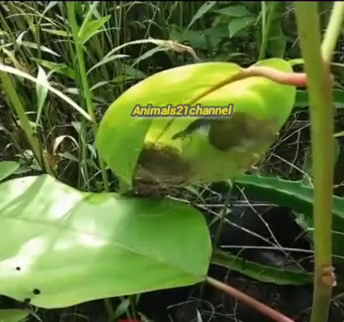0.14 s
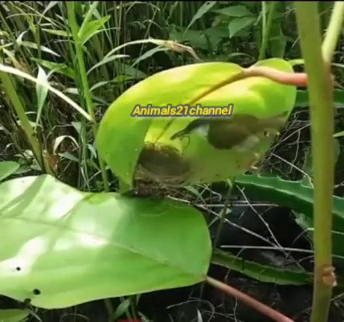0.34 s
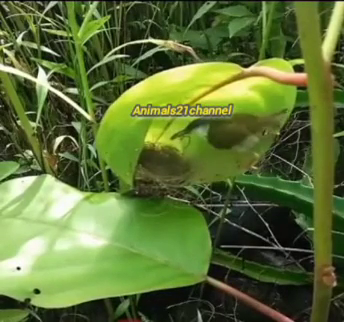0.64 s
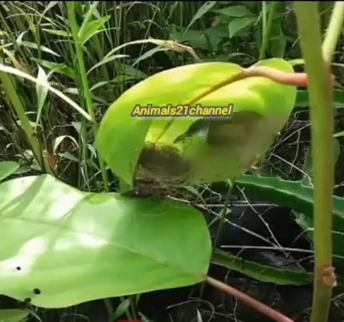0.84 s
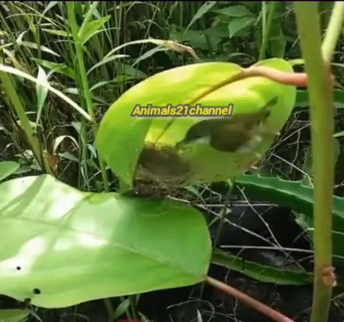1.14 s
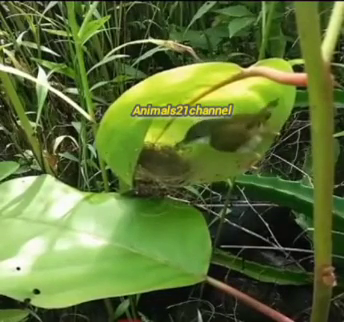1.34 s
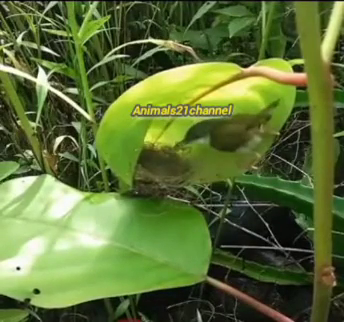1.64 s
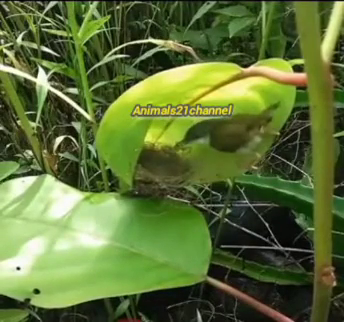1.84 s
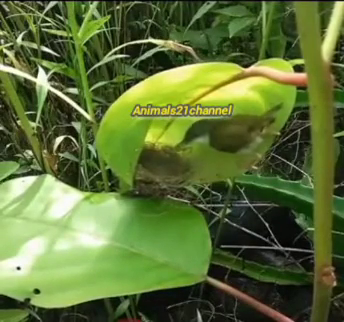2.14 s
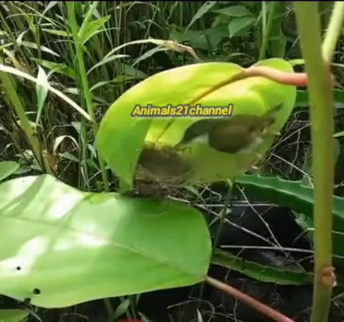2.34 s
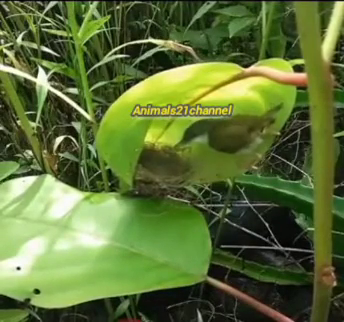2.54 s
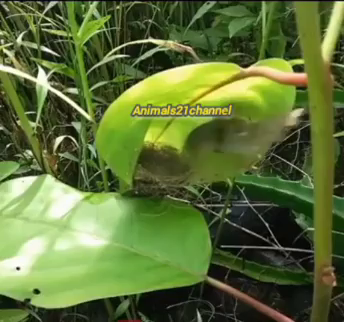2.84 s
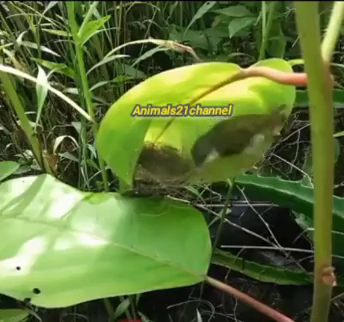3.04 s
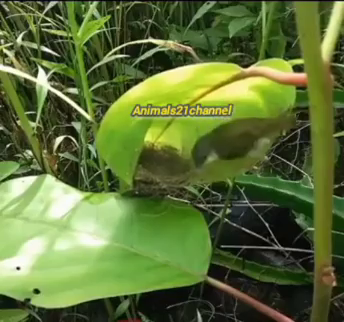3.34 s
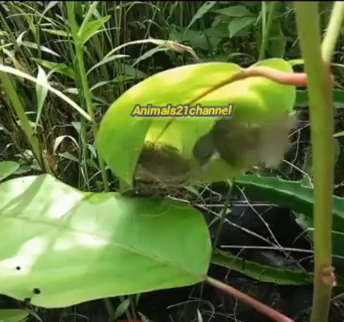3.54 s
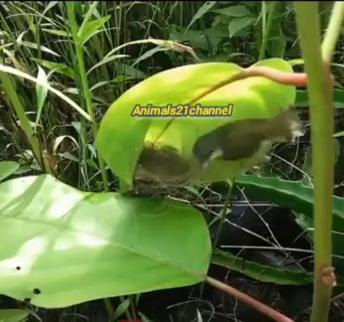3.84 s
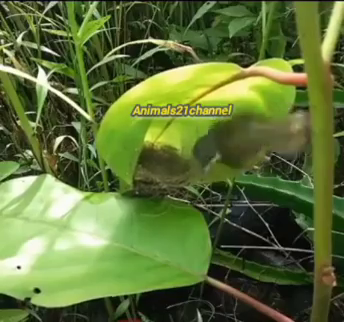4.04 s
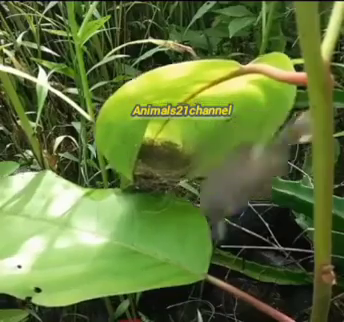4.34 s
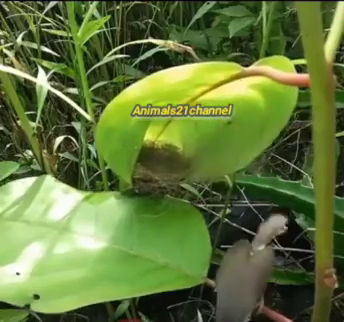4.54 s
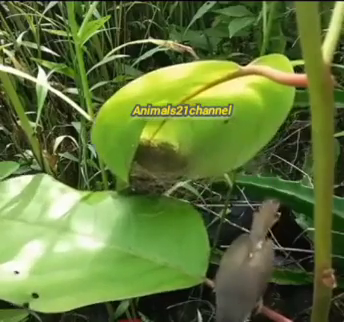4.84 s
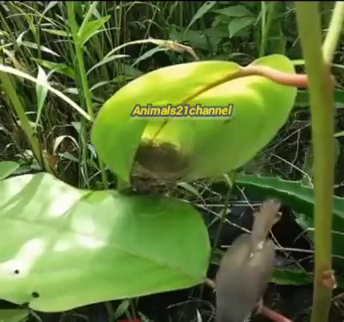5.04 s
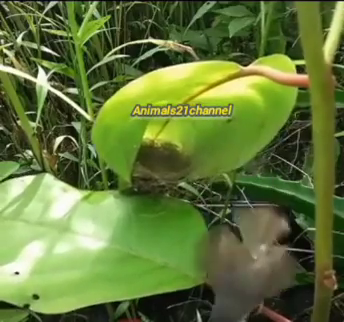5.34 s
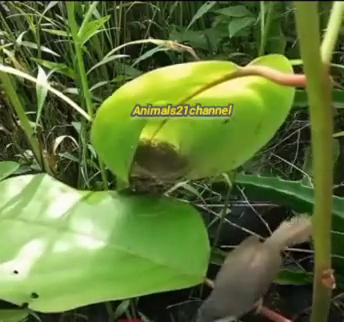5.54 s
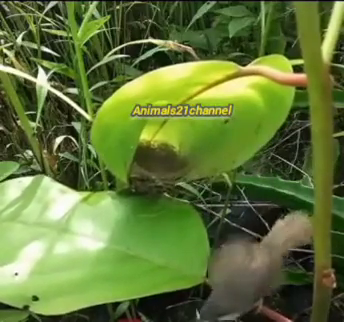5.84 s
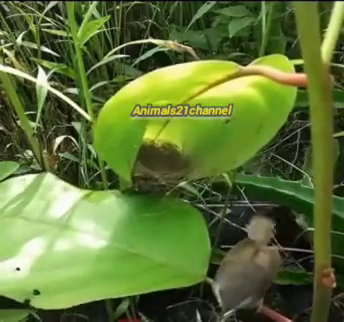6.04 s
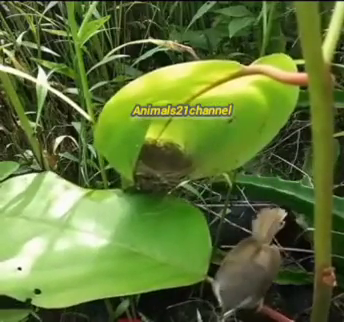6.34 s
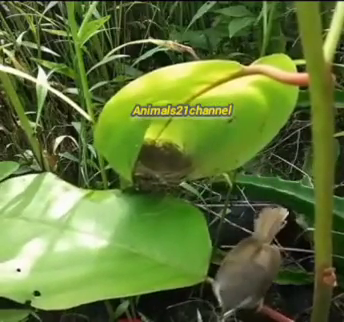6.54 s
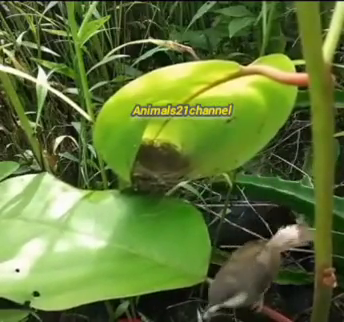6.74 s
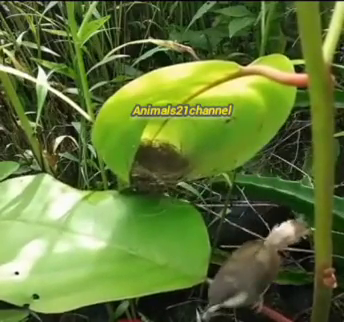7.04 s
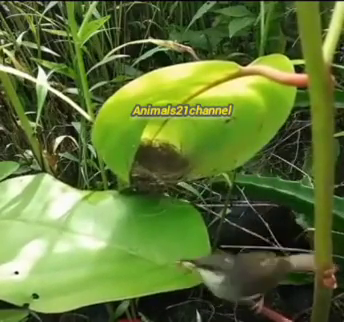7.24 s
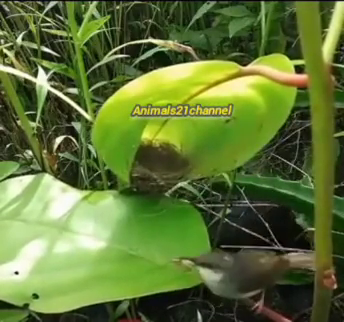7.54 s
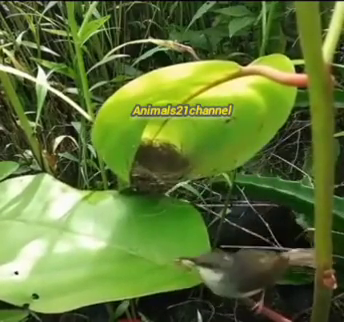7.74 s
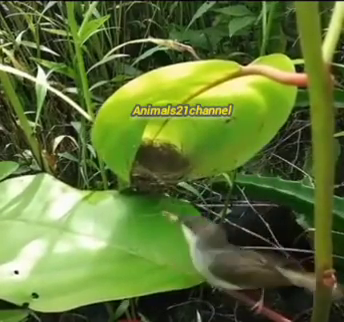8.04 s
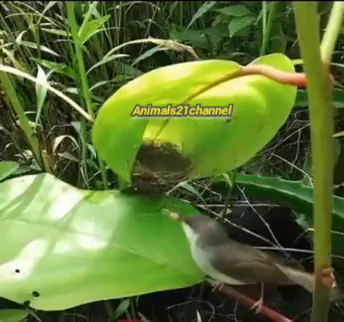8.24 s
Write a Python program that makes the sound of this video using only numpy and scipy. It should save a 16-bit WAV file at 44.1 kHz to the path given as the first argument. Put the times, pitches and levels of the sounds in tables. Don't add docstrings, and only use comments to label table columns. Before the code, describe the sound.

Outdoors in thick foliage, a steady low-pitched cicada buzz, a cricket chirping about five times a second, faint insect ticking and soft wind run throughout. At 0-0.8 s a bird a few metres away sings rapid high pips and sliding whistles, followed by scratchy rasps until 0.9. From 1.06 to 2.3 a closer bird gives piercing rising whistles, some breathy, with brief chattering chips. A tiny twig tick comes at 2.55. A buzzing trill at 2.8-3.0 leads into bounced notes and a hurried whistled run, 3.2-3.9, with a dull handling bump near 3.9. Scooped whistles with dropping flicks sound at 4.3-4.5. The middle is quiet: faint distant calls around 4.9, 6.2 and 6.5, dry rasps at 5.5-5.8. Another trill buzzes at 6.8-7.05, then three whistled phrases at 7.25, 7.6 and 8.0. Cricket and drone strengthen slightly towards 8.4. Leaves leave short, fluttering echoes.

```python
import sys
import numpy as np
from scipy import signal
from scipy.fft import rfft, irfft
from scipy.io import wavfile
from scipy.ndimage import uniform_filter1d

SR = 44100
rng = np.random.default_rng(int(sys.argv[2]) if len(sys.argv) > 2 else 0)


def ratio_of_db(decibels):
    return 10 ** (np.asarray(decibels, float) / 20)


def log_audio(samples):
    frames = np.atleast_2d(samples).T
    limited = np.clip(frames, -1, 1)
    pcm = np.round(limited * 32767).astype(np.int16)
    wavfile.write(sys.argv[1], SR, pcm)


N = 370440


def level(x, db):
    return x * ratio_of_db(db) / np.sqrt(np.mean(np.abs(x) ** 2))


def band(x, lo_hz, hi_hz):
    return signal.sosfilt(signal.butter(2, [lo_hz, hi_hz], "band", fs=SR, output="sos"), x)


def flutter(hz):
    size = N // 8 + 2
    noise = rng.standard_normal(size) + 1j * rng.standard_normal(size)
    slow = signal.sosfilt(signal.butter(4, hz, fs=SR / 8, output="sos"), noise)
    return level(np.interp(np.arange(N) / 8, np.arange(size), slow), 0)


def joined(a, b):
    return abs(a[0] + a[1] - b[0]) < .0015 and abs(a[3] / b[2] - 1) < .04


# (from [s], to [s], level under the note [dB])
OCTAVE_DOWN = [(1.47, 1.6, -38), (1.742, 2.1, -24.5), (2.149, 2.4, -22), (4.339, 4.6, -19.5),
               (7.258, 8.3, -21)]
# (from [s], to [s])
WARBLED = [(0, .12), (.56, .64), (.69, .82), (1.74, 1.77), (2.15, 2.225), (3.64, 3.76)]


def bird(notes, perch, partials, edge_s, waver, breath):
    out, phase = np.zeros((2, N + SR), complex), 0.
    port_hz, pan_db, lead = np.transpose(perch)
    patchy_db = 5 * flutter(hz=45).real
    for k, row in enumerate(notes):
        s, length, hz0, hz1, db0, db1 = row
        tied = k > 0 and joined(notes[k - 1], row)
        if tied:
            hz0, db0 = notes[k - 1][3], notes[k - 1][5]
        size = int(length * SR) + 2
        hz = np.linspace(hz0, hz1, size)
        gain = ratio_of_db(np.linspace(db0, db1, size))
        rise = np.clip(np.arange(size) / SR / min(edge_s, length / 2), 0, 1)
        fade = np.sin(np.pi / 2 * rise) ** 2
        if not tied:
            start, gain = int(s * SR), gain * fade
        if k + 1 == len(notes) or not joined(row, notes[k + 1]):
            gain = gain * fade[::-1]
        if any(t0 <= s < t1 for t0, t1 in WARBLED):
            shake = np.sin(2 * np.pi * 170 * (start + np.arange(size)) / SR)
            hz, gain = hz + 110 * shake, gain * (1 + .3 * shake)
        turn = phase + 2 * np.pi * np.cumsum(hz) / SR
        low_db = patchy_db[start:start + size] - np.clip((5850 - hz) / 30, 0, 30)
        half = [(.5, db + low_db) for t0, t1, db in OCTAVE_DOWN if t0 < s < t1]
        for multiple, db in list(partials) + half:
            heard = np.maximum(multiple, 1) * hz
            pan = np.interp(heard, port_hz, pan_db) * np.log(10) / 40
            side = pan + .5j * np.interp(heard, port_hz, lead)
            ports = np.exp([side, -side]) / np.sqrt(np.cosh(2 * pan))
            out[:, start:start + size] += ratio_of_db(db) * gain * np.exp(1j * multiple * turn) * ports
        start, phase = start + size, turn[-1]
    under = np.exp(-2j * np.pi * 500 * np.arange(N) / SR)
    skirt = under * np.array([flutter(hz=770), flutter(hz=740)])
    rough = 1 + waver * flutter(hz=265) + breath * skirt
    return (out[:, :N] * rough).real


def sung(notes, settle_s, soft_db, swell_s, sag_db_s):
    rows = []
    for s, length, hz0, hz1, db in notes:
        t = np.linspace(0, length, int(np.ceil(length / .006)) + 1)
        hz = hz1 + (hz0 - hz1) * np.exp(-t / settle_s)
        soft = np.exp(-t / swell_s) + np.exp((t - length) / .0019)
        loud = db - soft_db * soft - sag_db_s * t
        rows += zip(s + t[:-1], np.diff(t), hz[:-1], hz[1:], loud[:-1], loud[1:])
    return rows


# (time [s], length [s], start pitch [Hz], settled pitch [Hz], level [dB])
SONG_STEPS = [(.121, 0.061, 5364, 6830, -15.5), (.175, .051, 6700, 6110, -7.5),
              (.226, .032, 6066, 6077, -15), (.274, .022, 6099, 6256, -13.5), (.441, .018, 4900, 4560, -21),
              (.456, .027, 4560, 4550, -11), (.485, .016, 4500, 4550, -10), (.514, 0.052, 4933, 5033, -15),
              (.636, .009, 5000, 6100, -24), (.645, .075, 6750, 6800, -15), (.699, .022, 5800, 6094, -7.5),
              (.722, .082, 6130, 6190, -13.5), (3.555, .036, 4512, 4503, -14),
              (3.595, 0.019, 4394, 4500, -12), (3.62, .014, 4500, 4500, -16.5),
              (3.712, .04, 5000, 5250, -15.5), (3.735, .018, 5500, 6100, -14.5),
              (3.755, .028, 5000, 6500, -10.5), (3.785, .01, 6400, 6400, -3.5),
              (3.798, .02, 6400, 6417, -10.5), (3.824, .055, 6360, 6080, -8), (3.882, .02, 6330, 6100, -11),
              (3.212, .056, 5000, 5717, -8), (3.317, .038, 5500, 5595, -10)]


def song_notes():
    return sung(SONG_STEPS, settle_s=.0045, soft_db=4, swell_s=0.016, sag_db_s=42.5)


# (time [s], pitch [Hz], level [dB])
STUTTERED_PIPS = [(0.01, 4900, -10.5), (.031, 4900, -12), (.043, 5000, -13.5), (0.054, 5050, -12),
                  (.073, 5050, -19.5), (.093, 4950, -13), (.114, 4950, -17.5), (0.565, 5050, -8.5),
                  (0.574, 5000, -17.5), (0.586, 5000, -11.5), (.602, 4900, -8), (.629, 5000, -9),
                  (3.648, 4850, -7), (3.668, 4950, -7), (3.683, 4900, -14), (3.701, 4950, -11),
                  (8.377, 5250, -24.5)]


def pip_notes():
    pips = [(s, .012, .94 * hz, hz, db) for s, hz, db in STUTTERED_PIPS]
    return sung(pips, settle_s=.004, soft_db=2.0, swell_s=0.002, sag_db_s=111.5)


# (time [s], length [s], plateau pitch [Hz], level [dB])
SCOOPED_WHISTLES = [(2.775, .009, 6300, -18.5), (3.198, .011, 5700, -15), (4.285, 0.012, 5757, -21),
                    (4.301, .021, 6100, -13), (4.322, 0.056, 6136, -13), (7.239, 0.02, 6000, -20.5),
                    (7.259, .025, 6145, -17), (7.613, .027, 6105, -17), (7.648, 0.055, 6205, -16),
                    (8.002, 0.012, 6000, -18), (8.023, 0.027, 6050, -17.5), (8.044, .055, 6130, -17)]


def whistle_notes():
    scoops = [(s, length, .76 * hz, hz, db) for s, length, hz, db in SCOOPED_WHISTLES]
    return sung(scoops, settle_s=.005, soft_db=7, swell_s=0.033, sag_db_s=41)


# (time [s], length [s], start pitch [Hz], settled pitch [Hz], level [dB])
CARRIED_ON = [(0, .008, 4350, 4700, -21), (3.357, .018, 5617, 5500, -17), (4.375, .063, 6250, 6222, -23),
              (7.283, .054, 5750, 6200, -21.5), (7.34, 0.017, 5950, 6150, -19),
              (7.36, .012, 5907, 6220, -20.5), (7.374, 0.014, 6270, 6046, -18.5),
              (7.7, .012, 6290, 5990, -31), (7.716, .012, 6240, 6120, -24), (8.1, .011, 6044, 5947, -20),
              (8.112, .016, 6070, 6000, -26)]
# (time [s], length [s], start pitch [Hz], settled pitch [Hz], level [dB])
DEEP_CALLS = [
    (4.93, 0.013, 3743, 3546, -46),
    (6.175, .014, 4850, 4160, -43),
    (6.211, 0.018, 4775, 4140, -44),
    (6.467, 0.113, 5050, 5006, -45),
]


def held_notes():
    held = list(CARRIED_ON) + list(DEEP_CALLS)
    return sung(held, settle_s=0.00832, soft_db=-4.0, swell_s=.01, sag_db_s=1)


# (time [s], length [s], level [dB])
TRILL_ENDS = [
    (2.939, 0.01, -12),
    (2.955, .016, -13),
    (6.958, .012, -12),
    (6.967, .018, -14.5),
    (6.987, .02, -12),
]


def drop_notes():
    drops = [(s, length, 6500, 4250, db) for s, length, db in TRILL_ENDS]
    return sung(drops, settle_s=.014, soft_db=-4.0, swell_s=0.0024, sag_db_s=155.5)


# (time [s], length [s], sweep rate [1/s], low pitch [Hz], high pitch [Hz], level [dB])
BUZZING_TRILLS = [
    (2.789, .145, 190, 4643, 6336, -24),
    (2.968, .05, 170, 4500, 5700, -16),
    (6.798, .15, 230, 4643, 6300, -23),
    (7.004, .055, 170, 4500, 5800, -17.5),
]


def trill_notes():
    rows = []
    for s, length, rate, lo_hz, hi_hz, db in BUZZING_TRILLS:
        for t, c in zip(np.arange(s, s + length, 1 / rate), rng.standard_normal((99, 4))):
            rising = t < s + .45 * length or c[2] > .6
            ends = (lo_hz + 130 * c[0], hi_hz + 130 * c[1])[::1 if rising else -1]
            rows.append((t + 0.0013 * c[2], .007, *ends, db + 2.2 * c[3], db + 1.3 * c[3]))
    return rows


# (time [s], start pitch [Hz], level [dB])
CLOSING_FLICKS = [(4.436, 6300, -20), (4.446, 6170, -18), (4.466, 6210, -17.5), (7.391, 6193, -13),
                  (7.407, 6060, -17), (7.427, 6010, -19.5), (7.743, 6260, -21), (7.759, 6280, -15.5),
                  (7.78, 6170, -17), (8.131, 6180, -18.5), (8.15, 6030, -18), (8.172, 6140, -17.5)]


def flick_notes():
    rows = []
    for s, hz, db in CLOSING_FLICKS:
        rows.append((s, .007, hz, hz, db, db))
        rows.append((s + .007, .011, hz, .85 * hz, db, db - 11.5))
    return rows


# (time [s], hold [s], pitch [Hz], level [dB])
BOUNCED = [
    (3.266, .004, 5600, -12),
    (3.277, .009, 5700, -9),
    (3.296, .011, 5660, -9),
]


def bounce_notes():
    rows = []
    for s, hold, hz, db in BOUNCED:
        rows.append((s, .004, .92 * hz, hz, db - 5, db))
        rows.append((s + .004, hold, hz, hz, db, db - 3))
        rows.append((s + .004 + hold, .007, hz, .86 * hz, db - 3, db - 12))
    return rows


# (frequency [Hz], left minus right [dB], left leads [rad])
FAR_PATH = [(4500, -1.5, 1.5), (5000, -0.5, 1.79), (5500, -5.5, -1.5), (6100, 3, -1.53), (6380, 0, -2),
            (6800, -27.5, -14)]


def far_bird():
    clean = song_notes() + pip_notes() + whistle_notes() + held_notes() + drop_notes()
    quick = trill_notes() + flick_notes() + bounce_notes()
    return (bird(clean, FAR_PATH, [(1, 0)], edge_s=0.003, waver=0.12, breath=0.09)
            + bird(quick, FAR_PATH, [(1, 0.0044)], edge_s=0.003, waver=0.25, breath=0.2))


# (time [s], pitch [Hz], level [dB])
CLOSE_CONTOURS = [
    [(1.091, 4404, -26), (1.097, 4560, -19), (1.109, 4963, -23), (1.121, 5407, -15), (1.163, 5480, -15),
     (1.168, 5480, -27), (1.173, 5485, -16), (1.181, 5488, -14), (1.187, 5499, -26)],
    [(1.365, 5012, -30), (1.373, 5730, -21), (1.379, 5820, -14), (1.391, 5952, -13), (1.399, 6044, -15),
     (1.404, 6094, -30)],
    [(1.407, 5126, -28), (1.415, 5799, -13), (1.441, 6480, -15), (1.473, 6480, -14), (1.485, 6275, -24),
     (1.493, 6480, -15), (1.505, 6478, -15), (1.517, 6007, -33)],
    [(1.743, 5856, -22), (1.761, 6209, -17), (1.778, 6310, -13.5), (1.801, 6400, -13), (1.861, 6400, -14),
     (1.869, 6399, -34)],
    [(2.152, 5800, -24), (2.158, 5934, -15), (2.168, 6180, -20), (2.19, 6260, -17), (2.23, 6378, -17),
     (2.236, 6376, -13.5), (2.262, 6363, -16), (2.283, 6350, -20), (2.287, 6350, -30)],
]
# (time [s], length [s], start pitch [Hz], settled pitch [Hz], level [dB])
CLOSE_HELD = [
    (1.872, .012, 6360, 6350, -17),
    (2.302, .013, 6410, 6300, -9.5),
]
# (time [s], length [s], start pitch [Hz], settled pitch [Hz], level [dB])
OPENING_LINES = [
    (1.061, .014, 4100, 4650, -19),
    (1.062, .013, 6400, 6900, -16),
    (1.091, .016, 6300, 7250, -14.5),
    (1.125, .046, 6650, 6650, -28),
    (1.178, .038, 6650, 6650, -28),
    (1.163, .007, 7200, 7250, -24),
    (1.181, .007, 7200, 7250, -25),
    (1.203, .007, 7200, 7250, -27),
]


def near_notes():
    contours = [(a[0], b[0] - a[0], a[1], b[1], a[2] + 4.5, b[2] + 4.5)
                for call in CLOSE_CONTOURS for a, b in zip(call, call[1:])]
    held = sung(CLOSE_HELD, settle_s=0.025, soft_db=11, swell_s=0.02, sag_db_s=30)
    opening = sung(OPENING_LINES, settle_s=0.005, soft_db=4, swell_s=0.003, sag_db_s=32)
    return contours + held + opening


# (frequency [Hz], left minus right [dB], left leads [rad])
NEAR_PATH = [(4400, -11, -0.41), (5400, -9, 0.85), (5800, 0.5, 1), (6400, 2, 0.96), (6900, 4.5, 0.98)]
# (time [s], length [s], top line [Hz], level [dB])
CHATTER_NOTES = [
    (1.704, .01, 7050, -19),
    (1.714, .02, 7200, -19),
    (1.735, .01, 7150, -18),
    (2.109, .009, 7100, -18),
    (2.118, .01, 7000, -16.5),
    (2.143, .011, 7050, -14),
]
# (multiple of the top line, level [dB])
CHATTER_STACK = [(0.398, -23.5), (0.602, -13), (0.8, -2), (1.001, 1)]


def near_bird():
    calls = bird(near_notes(), NEAR_PATH, [(1, 1.0)], edge_s=0.005, waver=0.13, breath=0.09)
    chips = [(s, length, .93 * hz, hz, db) for s, length, hz, db in CHATTER_NOTES]
    chatter = sung(chips, settle_s=0.0015, soft_db=1.5, swell_s=.003, sag_db_s=49)
    return calls + bird(chatter, NEAR_PATH, CHATTER_STACK, edge_s=.003, waver=.3, breath=0.18)


# (time [s], length [s], start pitch [Hz], settled pitch [Hz], level [dB])
EARLY_RASPS = [
    (.761, .017, 4350, 4200, -19),
    (.79, .014, 4200, 4180, -17),
    (.831, 0.01, 3847, 4276, -13),
    (.846, .012, 3880, 4630, -13.5),
    (.886, 0.012, 4390, 4380, -20),
    (5.524, .012, 4150, 4000, -24),
    (5.535, .011, 4200, 4000, -23),
    (5.551, .014, 4150, 4050, -24),
    (5.565, .008, 3950, 3450, -31),
]
LATE_RASPS = [
    (5.699, .011, 4000, 4050, -30),
    (5.71, .011, 4100, 4050, -18),
    (5.736, .012, 4100, 3950, -18),
    (5.746, .011, 4350, 4080, -20),
    (5.757, .014, 4250, 4050, -20),
    (5.775, .016, 4200, 4050, -20),
]
# (frequency [Hz], left minus right [dB], left leads [rad])
EARLY_PATH = [(4000, -2.5, -2), (6100, 5.5, -2.5)]
LATE_PATH = [(4000, -8.5, 0.3), (6100, -9, 1)]
# (multiple of the note, level [dB])
RASP_STACK = [(.5, -16), (1, 5), (1.5, 3.5), (2, -15)]


def rasping():
    out = np.zeros((2, N))
    for rasps, path in ((EARLY_RASPS, EARLY_PATH), (LATE_RASPS, LATE_PATH)):
        notes = sung(rasps, settle_s=0.0051, soft_db=7, swell_s=0.0026, sag_db_s=46.5)
        out += bird(notes, path, RASP_STACK, edge_s=0.0048, waver=0.3, breath=0.16)
    return out


# (time [s], length [s], low edge [Hz], high edge [Hz], level [dB])
PUFFS = [(.0, 0.15, 3820, 5680, -30), (0.753, .14, 3070, 7340, -31), (1.106, .114, 6900, 7700, -33),
         (1.11, .11, 4250, 5300, -30), (1.385, .068, 7500, 8100, -42), (2.15, .09, 5400, 7200, -27),
         (1.1, .12, 3000, 9800, -41), (1.347, .03, 3600, 8500, -39), (1.7, .19, 3800, 9800, -44),
         (2.14, .19, 3800, 9800, -41), (.51, .135, 4300, 6100, -29), (5.52, .05, 2800, 9000, -46),
         (5.733, .06, 2800, 9000, -43), (1.745, .05, 5500, 7200, -28), (1.348, 0.098, 4640, 6340, -28),
         (1.697, 0.08, 4000, 7800, -32.5), (2.111, 0.014, 2390, 7750, -32), (2.2, .135, 5000, 7100, -32),
         (2.943, 0.097, 3690, 6100, -30), (5.552, 0.08, 2420, 3900, -41.5), (6.968, 0.11, 4210, 5800, -26),
         (2.79, 0.14, 4660, 6900, -30.5), (6.8, 0.2, 4680, 7050, -36), (1.359, 0.079, 7050, 14300, -45),
         (1.136, 0.093, 1885, 2780, -45), (1.707, .06, 12000, 14200, -57), (2.15, 0.072, 13500, 14500, -53)]


def hoarse():
    out, chop = np.zeros((2, N)), ratio_of_db(2.7 * flutter(hz=155).real)
    for s, length, lo_hz, hi_hz, db in PUFFS:
        start, size = int(s * SR), int(length * SR)
        noise = rng.standard_normal((2, size)) + rng.standard_normal(size)
        puff = band(band(noise, lo_hz, hi_hz), lo_hz, hi_hz) * chop[start:start + size]
        out[:, start:start + size] += level(puff, db) * signal.windows.tukey(size, .35)
    return out


def leaves(x, t60, db):
    t = np.arange(SR) / SR
    tail = rng.standard_normal((2, SR)) * 1000. ** (-t / t60) * np.clip(t / 0.011, 0, 1)
    tail *= ratio_of_db(db) / np.sqrt(np.sum(tail ** 2, axis=1, keepdims=True))
    return x + signal.fftconvolve(x, tail, axes=1)[:, :N]


# (time [s], width [ms], level change [dB])
LOUDNESS_SWELLS = [(0.028, 3.0, 8.0), (0.08, 7.0, 3.5), (0.173, 2.0, 6.5), (0.196, 4.5, 3.0), (0.239, 7.0, 7.5),
                   (0.283, 2.0, 6.0), (0.505, 3.0, 8.0), (0.727, 4.5, 3.0), (0.821, 7.0, 4.0),
                   (0.857, 2.0, 5.0), (1.402, 2.0, 6.0), (1.424, 2.0, 4.5), (1.738, 11.0, 3.0),
                   (1.927, 7.0, 8.0), (2.16, 3.0, 3.0), (2.796, 4.5, 7.0), (2.88, 11.0, 3.5), (2.952, 2.0, 8.0),
                   (3.275, 2.0, 4.0), (3.319, 2.0, 5.0), (3.328, 2.0, 4.5), (3.616, 2.0, 8.0),
                   (3.665, 2.0, 8.0), (3.683, 2.0, 8.0), (3.698, 3.0, 7.5), (3.797, 2.0, 7.5),
                   (3.822, 3.0, 8.0), (3.844, 7.0, 4.0), (3.886, 4.5, 4.0), (4.402, 11.0, 3.5),
                   (4.423, 3.0, 5.0), (5.523, 7.0, 6.5), (5.548, 2.0, 8.0), (5.548, 11.0, 8.0),
                   (5.583, 11.0, 8.0), (5.748, 2.0, 5.5), (6.892, 2.0, 8.0), (7.05, 2.0, 7.5),
                   (7.334, 7.0, 4.5), (7.373, 3.0, 8.0), (7.39, 2.0, 8.0), (7.705, 3.0, 8.0),
                   (7.733, 11.0, 3.5), (7.734, 7.0, 8.0), (8.098, 2.0, 8.0), (8.128, 2.0, 8.0),
                   (8.145, 3.0, 6.5)]
# (time [s], width [ms], level change [dB])
LOUDNESS_DIPS = [(0.047, 7.0, -3.5), (0.099, 4.5, -4.0), (0.179, 2.0, -4.0), (0.214, 4.5, -2.0),
                 (0.255, 2.0, -6.0), (0.345, 11.0, -8.0), (0.411, 11.0, -6.0), (0.524, 4.5, -8.0),
                 (0.572, 3.0, -9.5), (0.594, 3.0, -4.5), (0.608, 3.0, -5.0), (0.637, 2.0, -7.0),
                 (0.708, 2.0, -4.0), (1.08, 3.0, -10.0), (1.361, 2.0, -10.0), (1.41, 4.5, -3.0),
                 (1.769, 7.0, -3.0), (1.815, 11.0, -2.5), (1.839, 2.0, -3.5), (2.151, 3.0, -4.0),
                 (2.27, 7.0, -3.5), (3.022, 4.5, -9.5), (3.28, 2.0, -4.0), (3.335, 2.0, -5.5),
                 (3.374, 11.0, -6.5), (3.609, 2.0, -8.5), (3.652, 3.0, -5.5), (3.676, 3.0, -4.5),
                 (3.709, 2.0, -7.0), (3.789, 2.0, -5.0), (3.949, 11.0, -4.5), (3.999, 11.0, -6.5),
                 (4.046, 11.0, -7.0), (4.469, 2.0, -8.0), (5.542, 2.0, -5.0), (6.94, 7.0, -4.5),
                 (7.049, 11.0, -5.0), (7.399, 3.0, -4.5), (8.108, 4.5, -4.0), (8.135, 2.0, -5.5)]


def swells_and_dips():
    t, path_db = np.arange(N) / SR, np.zeros(N)
    for s, width_ms, db in list(LOUDNESS_SWELLS) + list(LOUDNESS_DIPS):
        close = slice(max(int((s - .05) * SR), 0), int((s + .05) * SR))
        path_db[close] += db * np.exp(-.5 * ((t[close] - s) * 1000 / width_ms) ** 2)
    return ratio_of_db(path_db)


# (frequency [Hz], level [dB])
WHINE_LINES = [(10150, 1), (11542, 3)]
# (time [s], length [s], level [dB])
WHINE_SPANS = [(1.09, .13, -56), (1.21, .1, -66), (1.365, .075, -55), (1.7, .185, -58), (2.105, .03, -58),
               (2.145, .095, -57), (2.245, .08, -63), (5.52, .1, -64), (5.74, .035, -58)]


def whine():
    t, gate, out = np.arange(N) / SR, np.zeros(N), np.zeros(N)
    for s, length, db in WHINE_SPANS:
        gate += ratio_of_db(db) * np.clip(np.minimum(t - s, s + length - t) / .01, 0, 1)
    for hz, db in WHINE_LINES:
        out += ratio_of_db(db) * gate * (1 + .3 * flutter(hz=15).real) * np.sin(2 * np.pi * hz * t)
    return out


# (time [s], level [dB])
DRONE = [
    (0.0, -49.5),
    (6.78, -48.5),
    (8.4, -44.5),
]


def cicadas():
    phase = np.cumsum(139.57 * (1 + .002 * flutter(hz=3).real)) / SR
    clicks = np.diff(np.floor(phase), prepend=0)
    solo = level(band(clicks, 1704, 1926), -5.5) + level(band(clicks, 1220, 2100), -14.5)
    chorus = band(band(rng.standard_normal(N), 1650, 1896), 1370, 2430) * ratio_of_db(2.0 * flutter(hz=60).real)
    return (solo + level(chorus, -1.87)) * ratio_of_db(np.interp(np.arange(N) / SR, *np.transpose(DRONE)))


# (time [s], chirps counted so far)
CHIRP_COUNT = [(0, -12.2), (2.42, 0), (4.6, 11), (5.41, 15), (6.64, 21), (8.4, 29.45)]


def cricket():
    t = np.arange(N) / SR
    beat = (np.interp(t, *np.transpose(CHIRP_COUNT)) + .5) % 1 - .5
    chirp = np.clip((.27 - np.abs(beat)) / 0.082, 0, 1)
    strokes = np.exp(-(140.0 * t % 1) / 0.38) * ratio_of_db(2.5 * flutter(hz=25).real)
    wing = np.exp(2j * np.pi * 6650 * t) * (1 + 1.5 * flutter(hz=300))
    swell = ratio_of_db(np.interp(t, [6.6, 7.8], [0, 4]))
    return level(band(chirp * strokes * wing.real, 6580, 7720), -51.0) * swell


def katydids():
    ticking = ratio_of_db(6.1 * flutter(hz=29.8).real)
    return level(band(rng.standard_normal(N), 3400, 3700) * ticking, -58.5)


# (time [s], frequency [Hz], ring [ms], level [dB])
KNOCK_HITS = [
    (2.551, 1500, 9.3, -34),
    (2.552, 4000, 12, -29.5),
    (3.889, 167, 11, -25),
]


def knocks():
    out, t = np.zeros(N), np.arange(2000) / SR
    for s, hz, ring_ms, db in KNOCK_HITS:
        hit = ratio_of_db(db) * np.exp(-t * 3000 / ring_ms) * np.sin(2 * np.pi * hz * t)
        out[int(s * SR):][:len(t)] += hit
    return out


# (frequency [Hz], level per Hz [dB])
AIR_COLOUR = [(15, -16.5), (30, -1.5), (66, -1.5), (232, -5.5), (443, -15), (700, -18), (1330, -18),
              (2600, -24), (3300, -8.5), (6000, -13), (7600, -14), (9400, -15.5), (10100, -32),
              (14800, -29), (15600, -50)]
# (frequency [Hz], likeness [0-1])
AIR_SHARED = [(150, 1), (300, 0.96), (600, 0.05), (1200, 0.37), (3000, 0.95), (8000, 0.24), (13000, 0.4)]


def air():
    log_hz = np.log(np.arange(1, N // 2 + 2) * SR / N)
    colour_hz, colour_db = np.transpose(AIR_COLOUR)
    like_hz, likeness = np.transpose(AIR_SHARED)
    colour = ratio_of_db(np.interp(log_hz, np.log(colour_hz), colour_db))
    like = np.clip(np.interp(log_hz, np.log(like_hz), likeness), 0, 1)
    mid = irfft(rfft(rng.standard_normal(N)) * colour * np.sqrt(1 + like), N)
    side = irfft(rfft(rng.standard_normal(N)) * colour * np.sqrt(1 - like), N)
    gusts = level(band(rng.standard_normal(N), 40, 160) * ratio_of_db(3.5 * flutter(hz=4).real), -57)
    breeze = np.array([mid + side, mid - side]) * ratio_of_db(1.9 * flutter(hz=4.4).real)
    return level(breeze, -45.5) + gusts


def scene():
    far = leaves(far_bird(), t60=0.79, db=-8)
    near = leaves(near_bird() + rasping() + hoarse(), t60=0.24, db=-15)
    birds = (far + near) * swells_and_dips() + whine()
    cricket_left = cricket() * ratio_of_db(np.array([[1.5], [-1.5]]))
    insects = cicadas() + katydids() + cricket_left
    return birds + insects + knocks() + air()


def starve(x, margin_db, slope_db):
    hz, _, frames = signal.stft(x, SR, nperseg=1024)
    power = np.sum(np.abs(frames) ** 2, axis=0)
    away_khz = np.abs(hz[:, None] - hz[power.argmax(axis=0)]) / 1000
    bar = power.max(axis=0) * ratio_of_db(-2 * (margin_db + slope_db * away_khz))
    keep = np.clip(uniform_filter1d(power, size=16, axis=0) / (bar + 1e-18), 0, 1) ** 3
    on_whine = np.any([abs(hz - line) < 90 for line, _ in WHINE_LINES], axis=0)
    spared = (hz < 2200) | on_whine
    return signal.istft(frames * np.where(spared[:, None], 1, keep), SR, nperseg=1024)[1][:, :N]


def low_pass(x):
    return signal.sosfilt(signal.butter(12, 15480, fs=SR, output="sos"), x)


def record(dry):
    clean = starve(dry, margin_db=39, slope_db=4)
    rounded = .9 * np.tanh(clean / .9)
    return low_pass(rounded)


dry = scene()
out = record(dry)
log_audio(out)
```